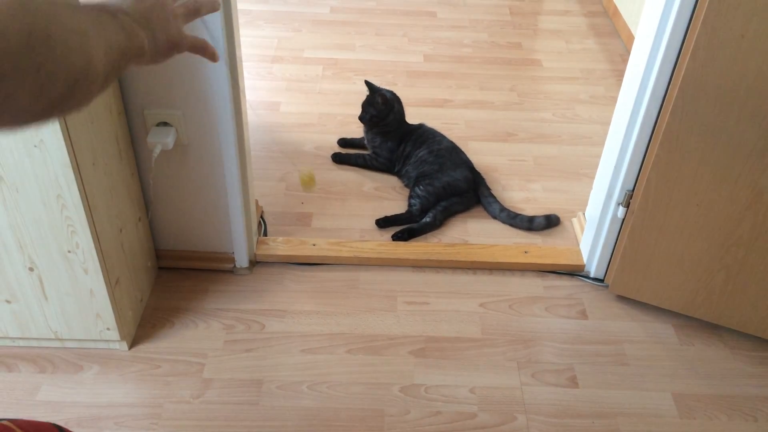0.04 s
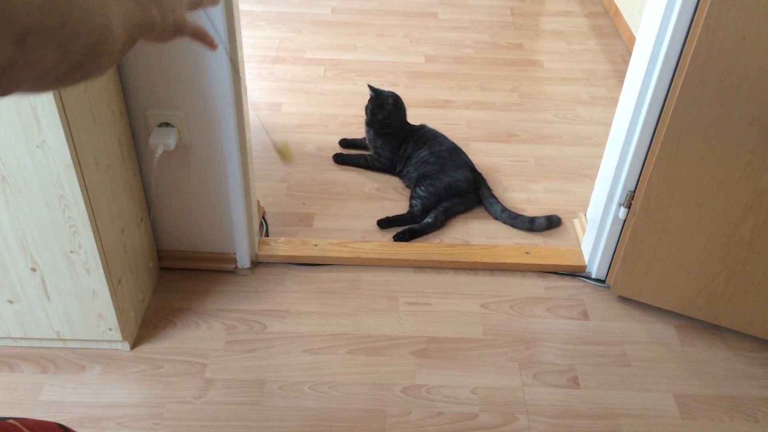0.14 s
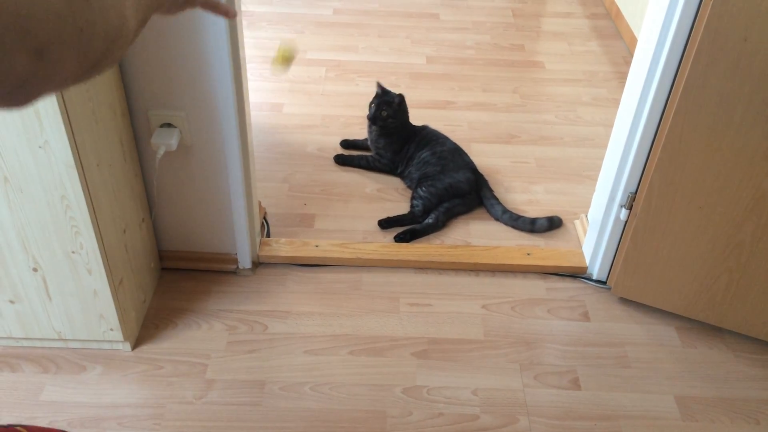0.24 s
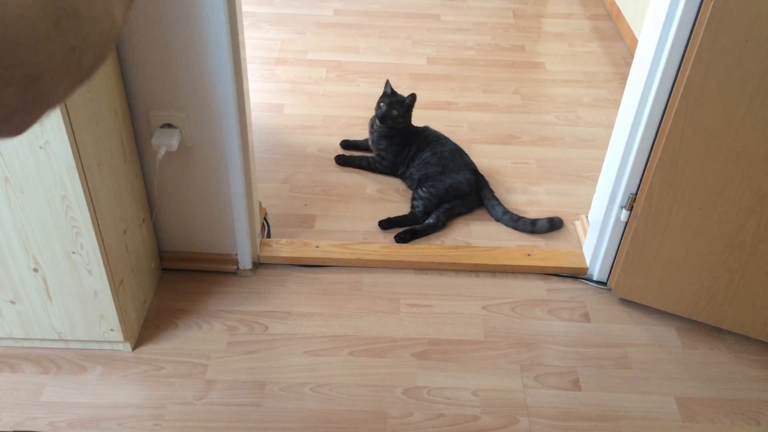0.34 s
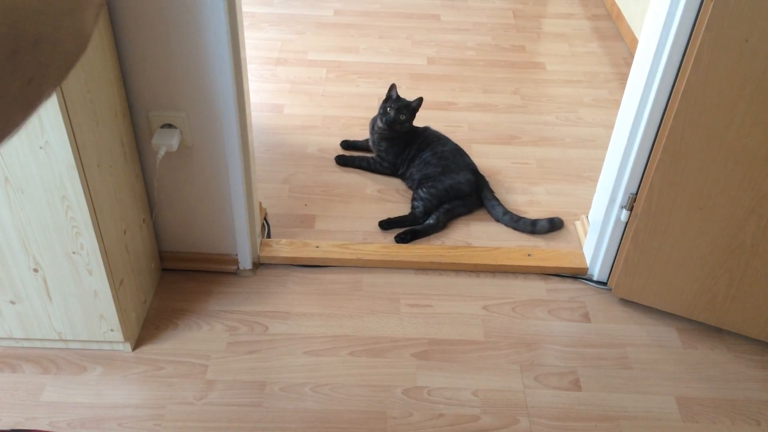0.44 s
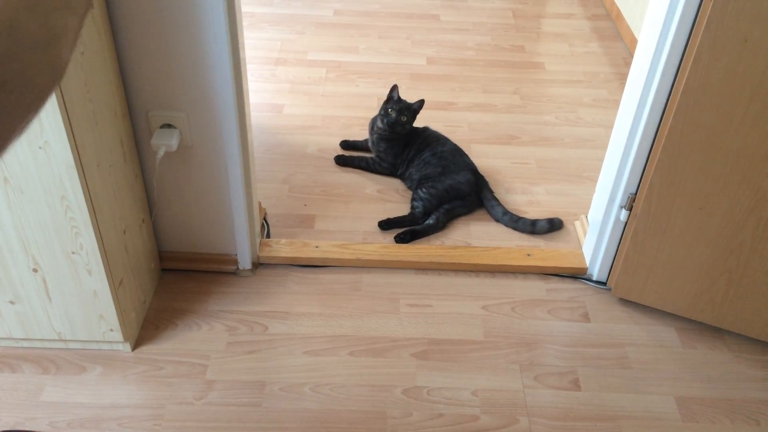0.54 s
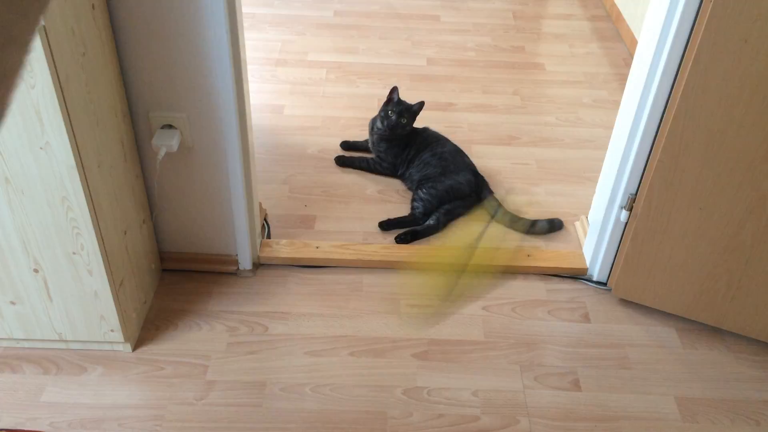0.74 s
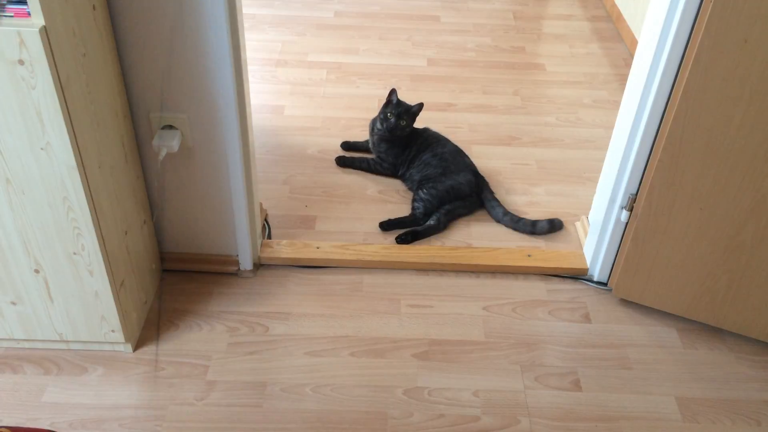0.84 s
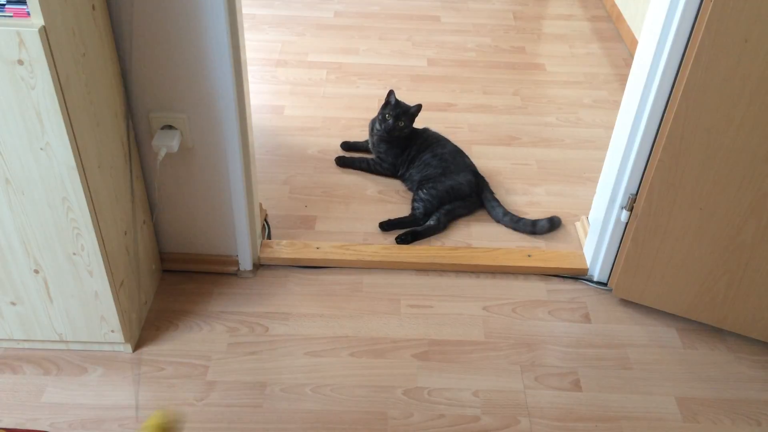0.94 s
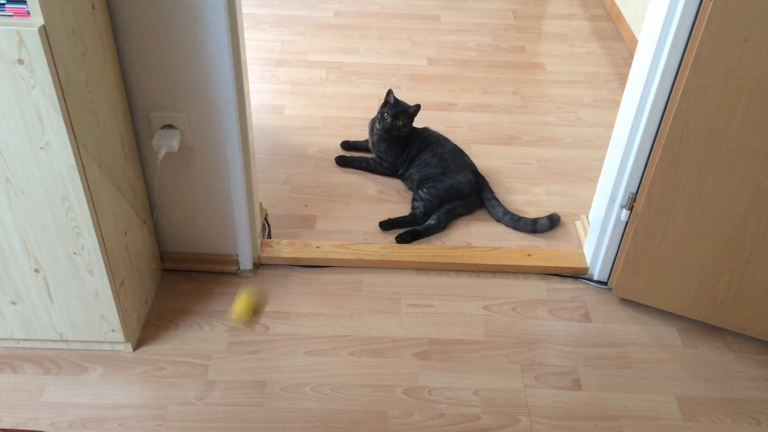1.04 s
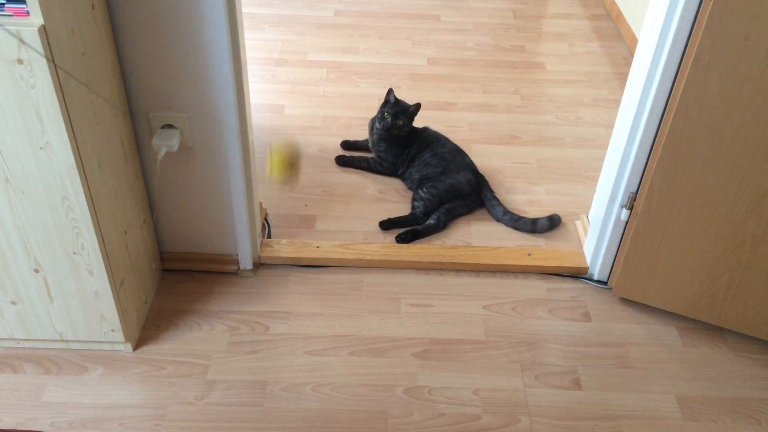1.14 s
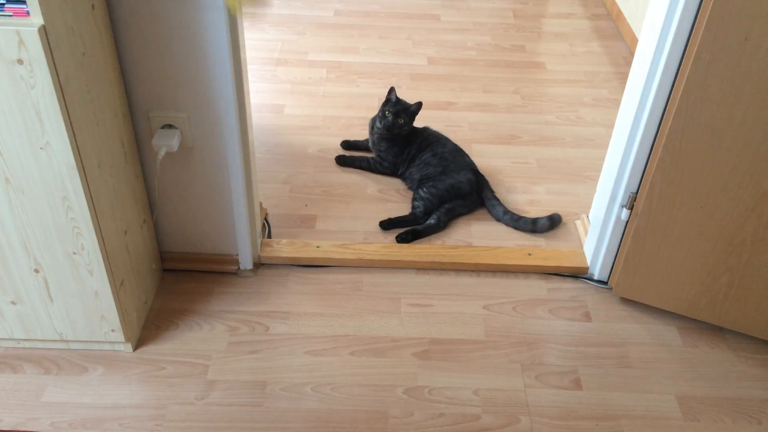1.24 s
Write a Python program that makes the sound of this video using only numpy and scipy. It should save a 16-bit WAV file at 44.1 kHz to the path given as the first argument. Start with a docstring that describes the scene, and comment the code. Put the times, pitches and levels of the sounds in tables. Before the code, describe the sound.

In a quiet room, a soft little ball lands nearby on a hard floor with a slap and a boomy thump, then bounces again with a light tap. Both ring briefly, over faint scuffs and ticks of movement.

```python
"""A small soft toy ball, tossed through a doorway, bounces twice on a laminate floor.
The first bounce is a sharp slap and a hollow thump: the boards give and wake the room's low modes.
The second is a light, crisp tap. Each time the skin crunches as the ball squashes, ball and boards
ring briefly, and the room adds a short tail.
Brief scuffs, faint ticks and a fading rustle of movement lie over the quiet room."""
import sys
import numpy as np
from scipy import signal
from scipy.fft import rfft, irfft
from scipy.io import wavfile

SR = 44100
rng = np.random.default_rng(int(sys.argv[2]) if len(sys.argv) > 2 else 0)


def generate_wav(signal):
    """Clip the signal to [-1, 1] and save it as 16-bit WAV at the path in sys.argv[1]."""
    frames = np.transpose(np.atleast_2d(signal))
    scaled = np.clip(frames, -1, 1) * 32767
    pcm = np.round(scaled).astype(np.int16)
    wavfile.write(sys.argv[1], SR, pcm)


N = 57330
T = np.arange(N) / SR
HZ = np.maximum(np.fft.rfftfreq(N, 1 / SR), 1)

# The two hits and their layer mix: (time [s], slap [dB], thump [dB], thump pitch [Hz],
# thump width [Hz], squash delay [s], crunch [dB], crunch t60 [s], rings [dB],
# boom send from the thump [dB], tail [dB], treble tilt [dB/octave])
BOUNCE_HITS = [(0.2096, -20.5, -16, 220.7, 128, 0.000081, -33.5, 0.025, -33, -1, -40, -1),
               (1.0305, -34, -41, 178, 230, 0.001715, -37, 0.023, -55, -8, -52, 3)]
def bounces():
    """The ball slaps down and squashes; the floor thumps and rings, and the room answers."""
    out = np.zeros(N)
    for (touch, slap_db, thump_db, pitch_hz, width_hz, squash_delay,
         crunch_db, crunch_t60, ring_db, boom_db, tail_db, tilt_db) in BOUNCE_HITS:
        squash = touch + squash_delay
        low_end = from_db(thump_db) * thump(squash, pitch_hz, width_hz)
        out += from_db(slap_db) * slap(touch)
        out += from_db(crunch_db) * crunch(squash, crunch_t60, tilt_db)
        out += from_db(ring_db) * (rings(squash) + doorway_ring(squash))
        out += low_end + from_db(boom_db) * room_boom(low_end)
        out += from_db(tail_db) * room_tail(squash, tilt_db)
    return out


def slap(start, band_hz=(700, 5000)):
    """First touch: one sharp pressure pulse."""
    pulse = signal.sosfilt(signal.butter(1, band_hz, "band", fs=SR, output="sos"), impulse(start))
    return -pulse / abs(pulse).max()


def thump(start, pitch_hz, width_hz, softness_hz=294):
    """The soft ball gives a dull push; the boards yield and swing for a few cycles."""
    push = signal.sosfilt(signal.butter(2, softness_hz, fs=SR, output="sos"), impulse(start))
    swing = resonate(resonate(push, pitch_hz, width_hz), pitch_hz, width_hz)
    return swing / abs(swing).max()


# Mid-forward colour of the ball's skin on the floor: (frequency [Hz], relative level [dB])
CRUNCH_EQ = [(100, -8.5), (560, -3.5), (850, 4), (1400, 10), (2200, 2.5), (3600, 0), (5500, -9),
             (9000, -16.5), (14000, -19)]
def crunch(start, t60, tilt_db):
    """The skin squashes against the floor in a snap of noise."""
    return noise(at_hz(CRUNCH_EQ, HZ) + treble_tilt(tilt_db)) * envelope(start, 10 / SR, t60)


# Short overtones of ball and boards: (frequency [Hz], relative level [dB], t60 [s])
RING_MODES = [(868, -4.5, 0.043), (1146, -24, 0.1), (1320, -9, .07), (1408, -16, 0.15), (1865, -12.5, 0.15),
              (2099, -10.5, .08), (2724, -11, 0.058), (3484, -19, 0.044), (4050, -26, 0.36),
              (5420, -12.5, 0.018)]
def rings(start, attack_s=0.0008):
    """Struck modes of ball and boards ring out, alternating in polarity."""
    out = np.zeros(N)
    for k, (hz, db, t60) in enumerate(RING_MODES):
        tone = (-1) ** k * np.cos(2 * np.pi * hz * (T - start))
        out += from_db(db) * tone * envelope(start, attack_s, t60)
    return out


def doorway_ring(start, pitch_hz=822, level_db=-7.5, delay_s=0.022):
    """One hollow resonance of the doorway swells and dies a moment after the hit."""
    tone = np.sin(2 * np.pi * pitch_hz * (T - start))
    return from_db(level_db) * tone * envelope(start + delay_s, attack_s=0.0052, t60=0.078)


# Early reflections off walls and ceiling: (delay [s], gain [dB])
REFLECTIONS = [(0.0256, -29), (0.0277, -14.5), (0.038, -23.5), (0.0687, -21.5)]
# Boomy low modes of the room: (frequency [Hz], gain [dB], t60 [s])
STANDING_WAVES = [(61.7, 16, 0.47), (106.2, 15, 0.44), (143, 10.5, 0.57), (182, 2, 0.41), (212.5, -7, 0.22),
                  (235.7, -5, 0.22), (322, 3, 0.17), (371, -4, 0.45)]
def room_boom(low_end, mode_delay_s=0.0217):
    """The thump comes back as a few echoes and drives the room's standing waves."""
    drive = delayed(low_end, mode_delay_s)
    waves = sum(from_db(db) * resonate(drive, hz, width_hz=np.log(1000) / np.pi / t60)
                for hz, db, t60 in STANDING_WAVES)
    return waves + sum(from_db(db) * delayed(low_end, lag) for lag, db in REFLECTIONS)


# Reverb colour and decay: (frequency [Hz], relative level [dB], t60 [s])
REVERB_BANDS = [(109, 11.5, 0.29), (250, -1, 0.46), (432, 3, 0.53), (528, -7.5, 0.52), (850, 0.5, 0.45),
                (1500, -3.5, 0.44), (2500, -7, 0.44), (3950, -5.5, 0.29), (7000, -13.5, 0.42),
                (14300, -23.5, 0.33)]
def room_tail(start, tilt_db, build_s=0.0017, low_cut_hz=50):
    """Diffuse reverberation, dying at its own rate in each half octave."""
    gain = from_db(at_hz(REVERB_BANDS, HZ) + treble_tilt(tilt_db)) * (HZ > low_cut_hz)
    spectrum = noise_spectrum(gain)
    half_octave = np.round(2 * np.log2(HZ))
    out = np.zeros(N)
    for band in np.unique(half_octave[gain > 0]):
        t60 = at_hz(REVERB_BANDS, 2 ** (band / 2), column=2)
        out += irfft(spectrum * (half_octave == band), N) * envelope(start, build_s, t60)
    return out


# Soft brushes: (time [s], attack [s], t60 [s], level [dB], centre [Hz], half width [octaves])
SCUFF_CUES = [(0.161, 0.018, .22, -44.5, 152, 0.27), (0.161, 0.0121, 0.1, -45.5, 396, 0.23),
              (0.155, 0.0097, 0.6, -55.5, 880, 0.77), (0.935, 0.021, 0.14, -72.5, 960, 0.39),
              (1.078, 0.013, 0.26, -55.5, 1640, 0.4), (1.078, 0.0075, 0.24, -62, 7000, 1)]
def scuffs():
    """Bands of noise brush in just before each bounce and just after the second."""
    return sum(from_db(db) * envelope(start, attack, t60) * noise(2 * bell_eq(hz, 2 * octaves))
               for start, attack, t60, db, hz, octaves in SCUFF_CUES)


# Faint, mostly bright detail: (time [s], level [dB], centre [Hz], t60 [s])
TICK_CUES = [(0.0735, -55.5, 8900, 0.032), (0.315, -52.5, 10000, 0.018), (0.3130, -56, 850, 0.097),
             (0.594, -63, 7000, .04), (0.607, -59.5, 4550, 0.072), (0.6821, -54, 6070, 0.016),
             (0.839, -57.5, 1500, 0.015), (0.838, -61, 7000, 0.011), (0.9353, -65, 9050, 0.044),
             (1.04, -47.5, 10300, 0.0073), (1.0914, -56.5, 2500, 0.0082)]
def ticks():
    """Tiny dry ticks, each a quick burst of broad noise."""
    return sum(from_db(db) * noise(bell_eq(hz, octaves=1.0)) * envelope(start, 20 / SR, t60)
               for start, db, hz, t60 in TICK_CUES)


# Fader ride of the rustle: (time [s], level [dB])
RUSTLE_FADER = [(0, -63.5), (0.08, -61), (0.15, -63.5), (0.4, -66), (0.5, -64.5), (0.57, -63.5),
                (0.65, -65.5), (0.8, -70), (0.87, -69), (1.0, -71), (1.3, -70)]
# Its broad, airy colour: (frequency [Hz], relative level [dB])
RUSTLE_EQ = [(200, -2.5), (600, 3), (1100, -1), (2000, -0.5), (4000, -3.5), (8000, -5), (13000, -5.5),
             (15000, -6.5)]
def rustle():
    """A hissy rustle of movement settles into the quiet of the room."""
    return fader(RUSTLE_FADER) * noise(at_hz(RUSTLE_EQ, HZ))


# Fader ride of the rumble: (time [s], level [dB])
RUMBLE_FADER = [(0, -64.5), (0.04, -55.5), (0.09, -63), (0.13, -69), (0.3, -47), (0.53, -66.5),
                (0.7, -66.5), (0.9, -71), (1.3, -69.5)]
# Its dark colour: (frequency [Hz], relative level [dB])
RUMBLE_EQ = [(20, -37), (35, -4.5), (55, -1.5), (80, -2), (140, -4.5), (220, -12.5), (400, -21),
             (900, -54.5)]
def rumble():
    """A bed of low noise that swells most around the first bounce, then sinks away."""
    return fader(RUMBLE_FADER) * noise(at_hz(RUMBLE_EQ, HZ))


def from_db(db):
    """Decibels to gain."""
    return 10 ** (np.asarray(db) / 20)


def fader(points):
    """Gain over time, gliding between (time, dB) points."""
    return from_db(np.interp(T, *np.transpose(points)))


def envelope(start, attack_s, t60):
    """Straight rise, then exponential decay."""
    rise = np.clip((T - start) / attack_s, 0, 1)
    return rise * from_db(-np.maximum(T - start - attack_s, 0) * 60 / t60)


def at_hz(points, hz, column=1):
    """Read a column of a table on a log-frequency axis."""
    points = np.array(points)
    return np.interp(np.log(hz), np.log(points[:, 0]), points[:, column])


def bell_eq(hz, octaves):
    """A rounded hill in the spectrum, in dB."""
    return -20 * np.log10(1 + (np.log2(HZ / hz) / octaves) ** 2)


def treble_tilt(db_per_octave, corner_hz=1300):
    """A slope above the corner, in dB."""
    return db_per_octave * np.log2(np.maximum(HZ / corner_hz, 1))


def noise_spectrum(gain):
    """Spectrum of unit-rms noise shaped by a gain curve."""
    return rfft(rng.standard_normal(N)) * gain / np.sqrt(np.mean(gain ** 2))


def noise(eq_db):
    """Unit-rms noise coloured by an EQ curve."""
    return irfft(noise_spectrum(from_db(eq_db)), N)


def impulse(start):
    """A unit click."""
    return np.maximum(1 - abs(T - start) * SR, 0) + 1e-18


def delayed(x, lag_s):
    """The same sound, arriving later."""
    return np.interp(T - lag_s, T, x, left=0)


def resonate(x, hz, width_hz):
    """A resonance with gain 1 at its peak."""
    radius = np.exp(-np.pi * width_hz / SR)
    feedback = [1, -2 * radius * np.cos(2 * np.pi * hz / SR), radius ** 2]
    return signal.lfilter([1, 0, -1], feedback, x) * (1 - radius ** 2) / 2


def scene():
    """Mono mix: the ball up front, small details and room tone behind."""
    return (bounces() + scuffs() + ticks() + rustle() + rumble())[None]


def record(dry, cutoff_hz=15800):
    """A steep high cut takes off the very top."""
    return signal.sosfilt(signal.cheby2(16, 60, cutoff_hz, fs=SR, output="sos"), dry)


dry = scene()
out = record(dry)
generate_wav(out)
```